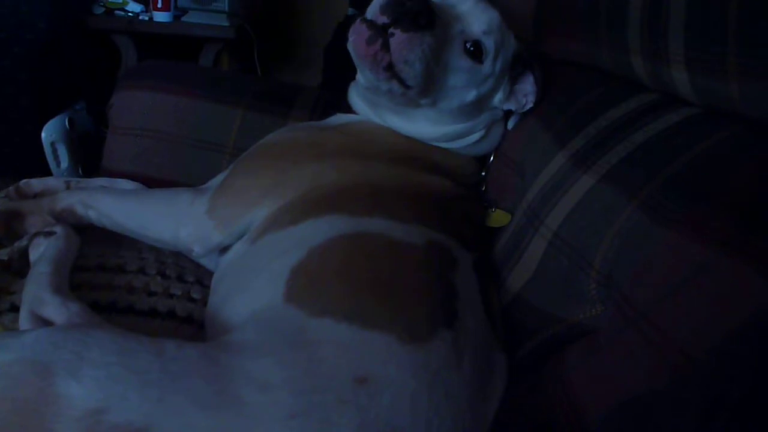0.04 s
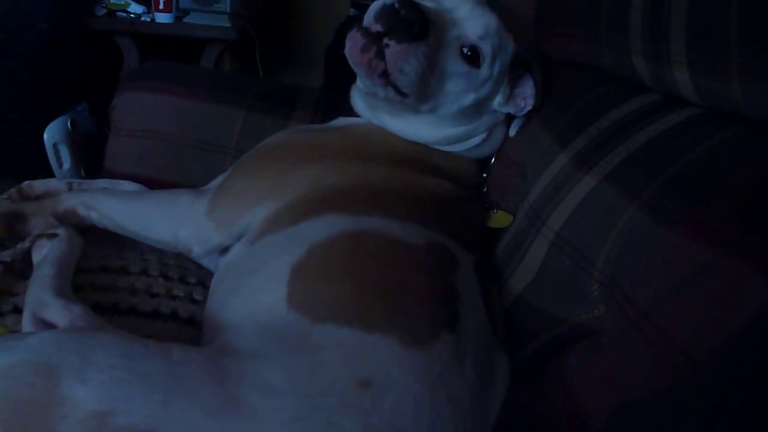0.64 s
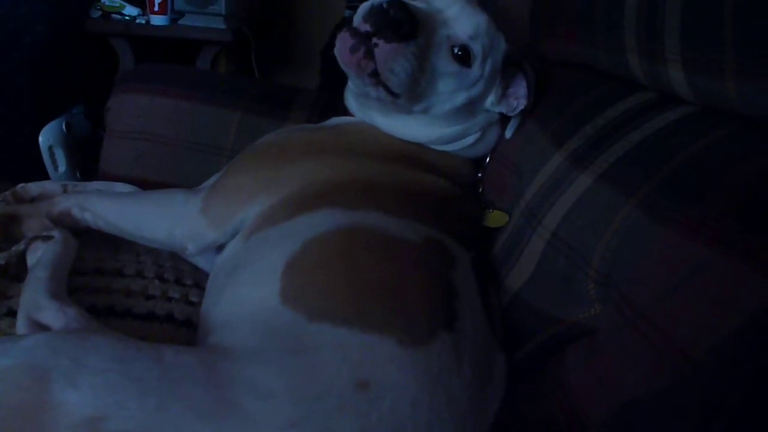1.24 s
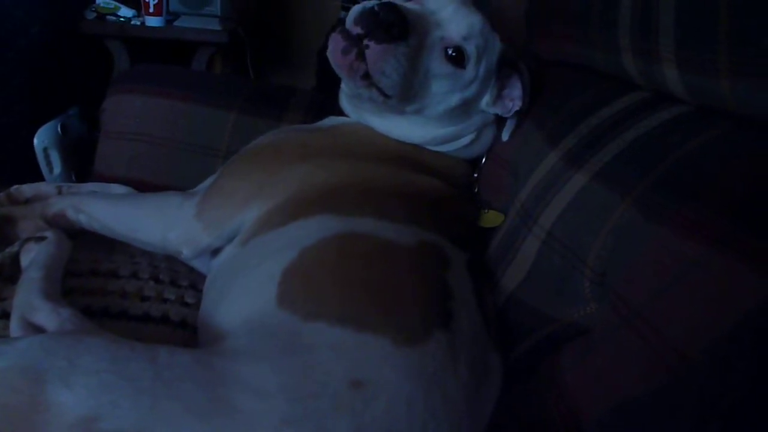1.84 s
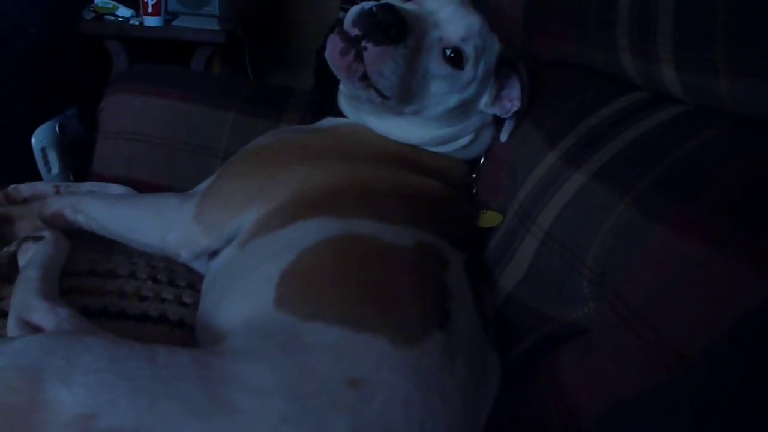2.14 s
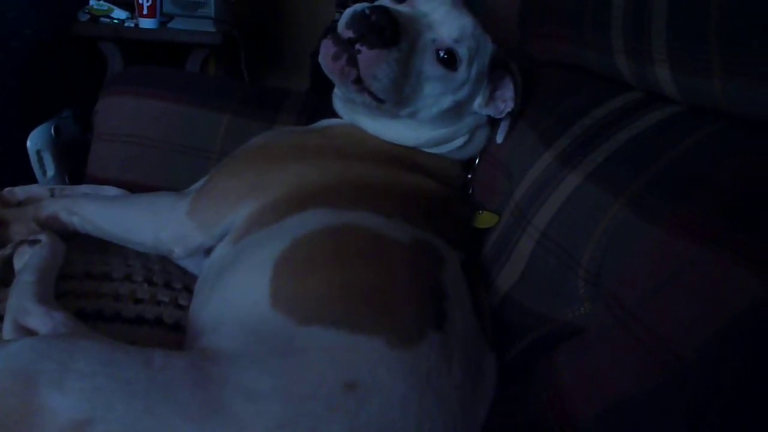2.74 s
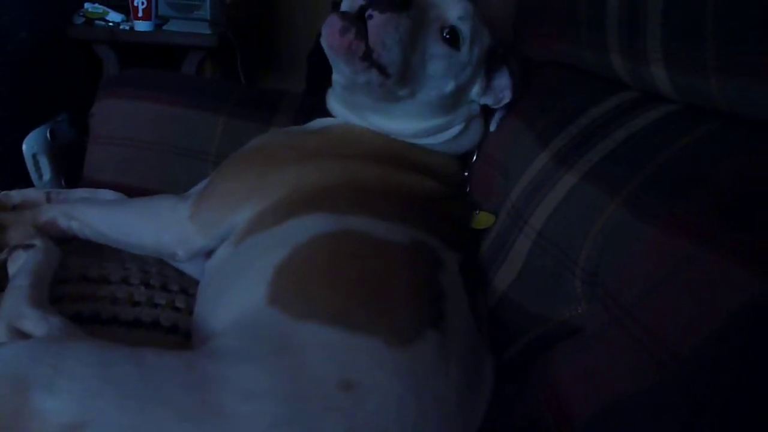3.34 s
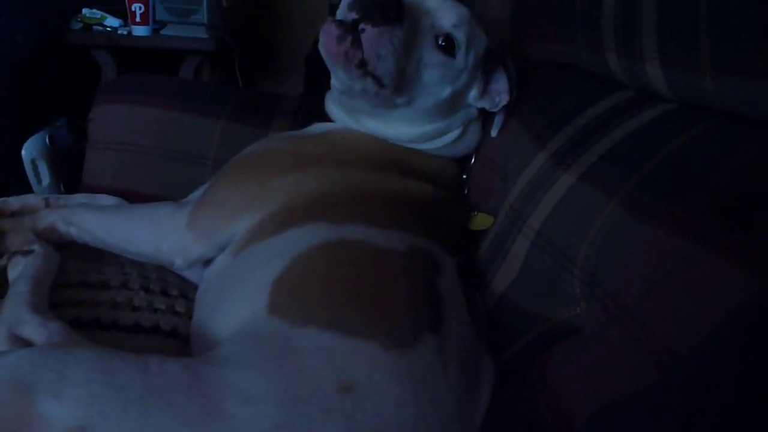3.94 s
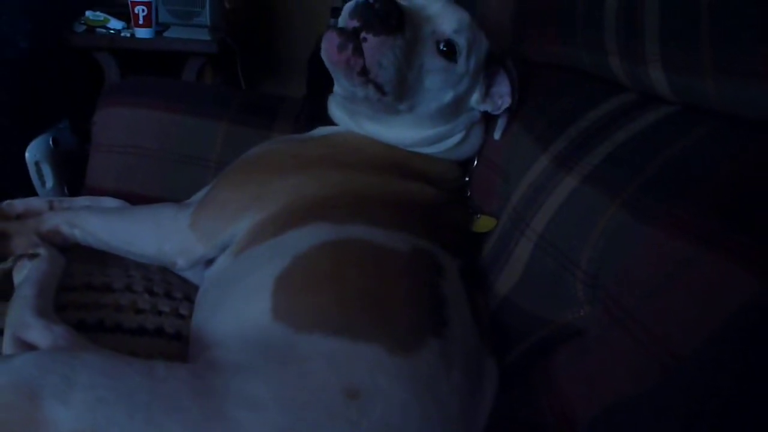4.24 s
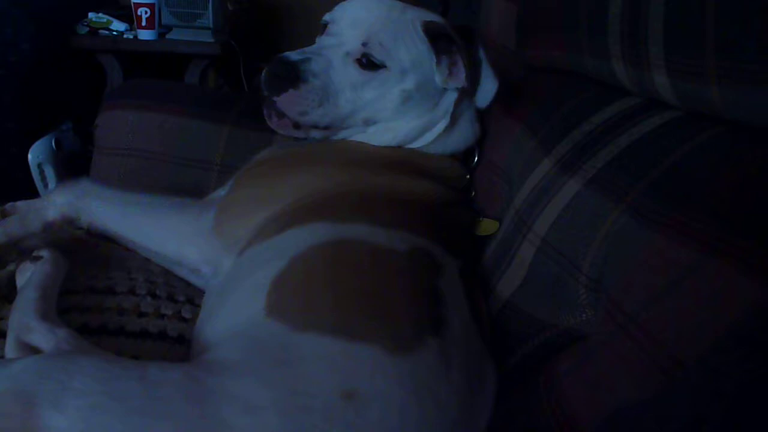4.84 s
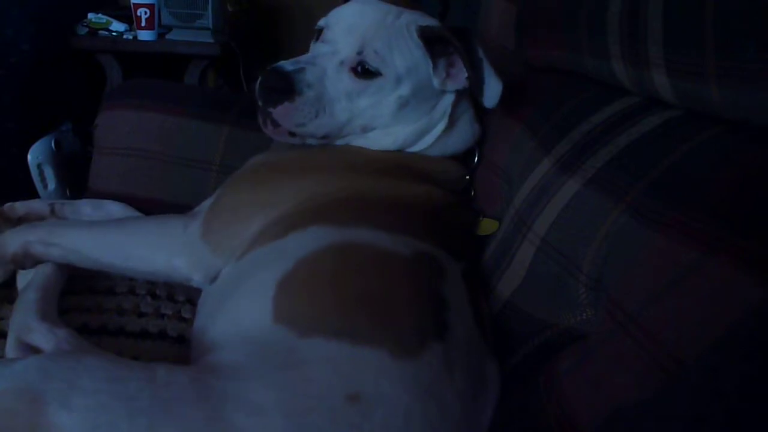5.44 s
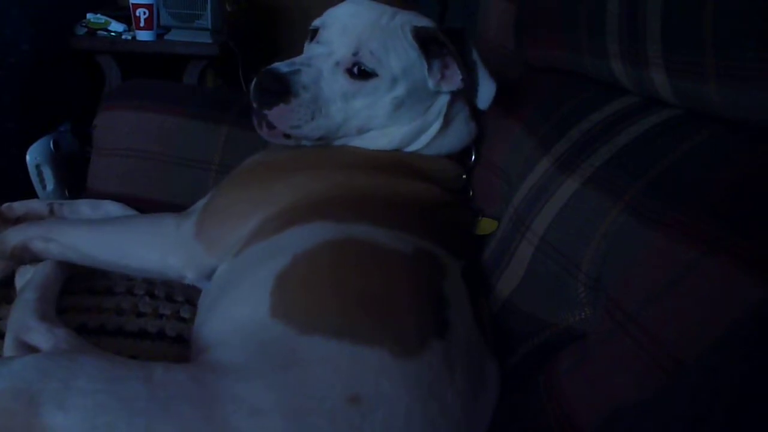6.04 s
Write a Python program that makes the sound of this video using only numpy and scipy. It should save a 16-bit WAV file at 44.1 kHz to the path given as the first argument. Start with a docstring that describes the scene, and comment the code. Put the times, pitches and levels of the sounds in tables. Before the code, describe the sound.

A young dog growls close to the microphone in a quiet furnished room. The growls are low, rough and throbbing, with an uneven rattle in the throat and a faint hiss on top. The first is brief, ending at 0.3 seconds, with a few small sharp ticks in it. A longer growl runs from about 1.2 to 2.3 seconds. Near 2.9 seconds the dog gives one short, clear yip that rises and falls in pitch and leaves the room ringing briefly. A third growl follows at once, tight at first and then looser, lasting until about 3.9 seconds. Another comes from 4.7 to 5.3 seconds, starting more open-mouthed, and a last one begins near 5.9 seconds, just before the sound ends. Soft room noise lies underneath, sinking under each call and swelling back in the pauses.

```python
"""A young dog on a sofa growls twice, close by, over soft room noise that sinks under each call.
Its slack vocal folds slap shut at uneven intervals, in throbs about 25 times a second, and each slap
rings chest, throat and mouth; now and then a sharp tick is heard. Near 3 s the same voice pulls tight
into one clean, arching yip that leaves the room ringing. The third growl follows at once, its folds
tight at first and then slack again, and two more growls end the scene."""
import sys
import numpy as np
from scipy import signal
from scipy.fft import rfft, irfft, next_fast_len
from scipy.io import wavfile
from scipy.ndimage import uniform_filter1d

SR = 44100
rng = np.random.default_rng(int(sys.argv[2]) if len(sys.argv) > 2 else 0)


def bounce(signal):
    """Save signal as a 16-bit WAV file at the path given by the first command-line argument."""
    frames = np.transpose(np.atleast_2d(signal))
    limited = np.clip(frames, -1, 1)
    pcm = np.round(limited * 32767).astype(np.int16)
    wavfile.write(sys.argv[1], SR, pcm)


N = 269010
T = np.arange(N) / SR
SIDES = np.array([[1], [-1]])   # opposite signs for left and right
YIP_START_S, YIP_BREAK_S, YIP_END_S = 2.917, 2.934, 3.026


def from_db(db):
    """Amplitude ratio of a level in decibels."""
    return 10 ** (np.asarray(db) / 20)


def rms_one(x):
    """Normalisation to unit mean power."""
    return x / np.sqrt(np.mean(x ** 2) + 1e-20)


def in_time(curve):
    """Linear interpolation of a curve at every sample."""
    return np.interp(T, *np.transpose(curve))


def at_hz(points, hz):
    """Interpolation of a spectrum on a log-frequency axis."""
    frequencies, values = np.transpose(points)
    return np.interp(np.log(hz + 1e-3), np.log(frequencies), values)


def smooth(x, seconds):
    """Triangular moving average."""
    size = max(int(seconds * SR), 1)
    return uniform_filter1d(uniform_filter1d(x, size), size)


def during(start, end):
    """Rectangular window: one between two times, else zero."""
    return 1. * ((T >= start) & (T <= end))


def evened(x, seconds):
    """Division by the envelope holds the short-term power at one."""
    return x / np.sqrt(np.abs(smooth(x ** 2, seconds)) + 1e-6 * np.mean(x ** 2))


def cut(x, hz, kind, order=2):
    """Butterworth low- or high-pass."""
    return signal.sosfilt(signal.butter(order, hz, kind, fs=SR, output="sos"), x)


def waver(depth, hz):
    """Random modulation: a factor about one, driven by low-passed noise."""
    return 1 + depth * rms_one(cut(rng.standard_normal(N), hz, "low"))


def resonator(hz, width):
    """Damped oscillator: a two-pole band-pass with unit peak gain."""
    r = np.exp(-np.pi * width / SR)
    return (1 - r * r) / 2 * np.array([1, 0, -1]), [1, -2 * r * np.cos(2 * np.pi * hz / SR), r * r]


def ring(x, modes):
    """Modal superposition: resonators (centre_hz, width_hz, gain_db) in parallel."""
    return sum(from_db(db) * signal.lfilter(*resonator(hz, width), x + 1e-18) for hz, width, db in modes)


def moving_ring(x, hz, width, size=512):
    """Time-varying resonance: centre and bandwidth are updated block by block."""
    out, state, width = np.zeros(N), np.zeros(2), np.broadcast_to(width, N)
    for i in range(0, N, size):
        out[i:i + size], state = signal.lfilter(*resonator(hz[i], width[i]), x[i:i + size], zi=state)
    return out


# Growls: start_s, end_s, attack_s, level_db, throb_period_s;
# balance against the throat, before trims: chest_db, jaw_db, mouth_db, snarl_db, nose_db;
# extra while the muzzle is open: jaw_gape_db, mouth_gape_db, snarl_gape_db;
# extra near the end: mouth_late_db; offset of the belly modes: belly_db
GROWLS = [(0, 0.298, 0.0031, -15, 0.055, -1.5, -21.5, -24, -38, -40, -.5, 1.15, 2.1, 1, 0),
          (1.186, 2.253, 0.016, -13, .037, -6, -25, -21.5, -41, -41, 2.5, 3.5, 7.1, -0.5, 0),
          (3.091, 3.949, 0.13, -14, .039, -6, -30.5, -22.5, -34, -36.5, 7.5, 14.3, 3.6, 1.5, 2),
          (4.747, 5.328, .026, -14.5, .036, -2.5, -12, -24, -47, -43.5, 12.5, 1.2, 4.4, 7, -1.5),
          (5.883, 6.595, 0.0076, -14, .038, -7.5, -8.5, -18.5, -44, -44.5, 1.5, 1.2, 2.1, -2, 0.5)]
# Brief catches of the voice: centre_s, length_s, gain_db
CATCHES = [(2.177, 0.062, -4.5), (5.102, 0.043, -3.5)]


def growl_gesture(closing_s=.21, tiring_s=.11, onset_db=-20, fade_db_per_s=2, release_db_per_s=441):
    """Articulation: level, balance and airway change as the muzzle closes and the air runs out."""
    rows = np.array(GROWLS)
    which = np.searchsorted(rows[:, 0], T, side="right") - 1
    start, end, attack, level, _, chest, jaw, mouth, snarl, nose = rows[which, :10].T
    *open_db, mouth_late, belly = rows[which, 10:].T
    age, left = T - (start + attack), end - T
    held = np.maximum(age, 0)
    tired = np.exp(-np.maximum(left, 0) / tiring_s)
    gape = np.array(open_db) * np.exp(-held / closing_s)
    jaw_gape, mouth_gape, snarl_gape = gape
    onset = onset_db * np.maximum(-age / attack, 0)
    level = level + onset - fade_db_per_s * held - .5 * tired + release_db_per_s * np.minimum(left, 0)
    level += sum(db * smooth(during(s - span / 2, s + span / 2), .01) for s, span, db in CATCHES)
    # as the air runs out, chest and hiss come forward
    balance = {"chest": chest - .35 * jaw_gape + tired,
               "belly": belly - 15.5 * tightness(),   # tight folds hardly ring the belly
               "jaw": jaw + jaw_gape,
               "mouth": mouth + mouth_gape + mouth_late * tired + onset,
               "snarl": snarl + snarl_gape + 11.5 * tired,
               "nose": nose + (2.5 + .43 * mouth_late) * tired}
    progress = np.minimum(held / (end - start), 1)
    return level, balance, airway_shape(which, held, progress, tired, gape)


# Airway in each growl: chest_hz, width_hz, chest_pull_share, lips_hz, lips_db, snarl_hz,
# snarl_width_hz, teeth_hz, teeth_db, lower_nasal_hz, upper_nasal_hz, upper_nasal_db
AIRWAY = [(226.25, 53, .55, 1840, 11.5, 2510, 240, 3350, -16, 5500, 6680, -2),
          (246, 57, .12, 1600, -4.5, 2380, 78, 3480, -15.5, 6860, 7020, 1),
          (274.9, 60, .15, 1557, -11.5, 2505, 110, 2784, -3.5, 5730, 6480, 3.5),
          (230, 40.5, .75, 1640, 2, 2750, 300, 3380, 4, 5405, 6250, -7.5),
          (232.2, 67.6, 0.44, 1670, 5, 2900, 500, 3100, 3, 5500, 6170, 0)]
# Throat resonance, arching in the growls and starting high when the mouth is wide: time_s, centre_hz
THROAT_CURVE = [(0, 420), (.29, 462), (1.19, 456), (1.27, 473), (1.6, 497), (2.25, 476), (3.2, 480),
                (3.5, 426), (3.65, 459.2), (3.94, 458.6), (4.76, 570), (4.97, 543), (5.32, 538),
                (5.89, 531.8), (6.1, 524.8)]


def airway_shape(which, held, progress, tired, gape):
    """Formants follow shape: opening widens them and raises the snarl; tiring relaxes the airway."""
    columns = np.array(AIRWAY)[which].T
    chest_hz, width, pull, lips_hz, lips_db, snarl_hz, snarl_width = columns[:7]
    teeth_hz, teeth_db, lower_hz, upper_hz, upper_db = columns[7:]
    jaw_gape, mouth_gape, snarl_gape = gape
    rest_chest_hz, rest_lips_hz, rest_nasal_hz, sag_hz_per_s = 227.05, 1710, 5550, 410
    lower_hz, upper_hz = lower_hz - sag_hz_per_s * held, upper_hz - sag_hz_per_s * held
    return {"chest_hz": chest_hz + (rest_chest_hz - chest_hz) * progress + 2.5 * mouth_gape,
            "throat_hz": in_time(THROAT_CURVE),
            "width_hz": (width + 1.5 * jaw_gape) * (1 - .78 * tired),
            "pull": pull - .14 * jaw_gape + .15 * tired + .7 * tightness(),
            "lips_hz": lips_hz + (rest_lips_hz - lips_hz) * tired, "lips_db": lips_db,
            "snarl_hz": snarl_hz + 24 * snarl_gape, "snarl_width_hz": snarl_width,
            "teeth_hz": teeth_hz, "teeth_db": teeth_db + .9 * snarl_gape,
            "lower_nasal_hz": lower_hz + (rest_nasal_hz - lower_hz) * tired,
            "upper_nasal_hz": upper_hz, "upper_nasal_db": upper_db}


def tightness(until_s=3.44, slacken_s=.13):
    """Fold tension, 0 to 1: it stays high for a while after the yip, then relaxes."""
    return during(YIP_END_S, until_s) * np.clip((until_s - T) / slacken_s, 0, 1)


def slackness():
    """Tension steadies the voice: this factor scales its unevenness down while the folds are tight."""
    return 1 - .2 * tightness()


# Throbs that stand out, each a burst of hard slaps: start_s, length_s, gain_db
SURGES = [(0.047, 0.033, 0), (0.091, 0.025, 0), (0.144, 0.017, 1), (0.187, 0.021, 2), (0.236, 0.057, 0.5),
          (1.208, 0.017, 0), (1.24, 0.014, 2.5), (1.274, 0.0089, 1), (1.306, 0.013, 1.5),
          (1.344, 0.013, -0.5), (1.378, 0.013, -1), (1.417, 0.014, 0), (1.486, 0.016, 0),
          (1.524, 0.016, 0.5), (1.599, 0.02, 0.5), (1.638, 0.011, 0.5), (1.689, 0.021, 0),
          (1.761, 0.017, -0.5), (1.875, 0.021, 1), (1.944, 0.016, 0.5), (2.024, 0.025, 1.5),
          (2.203, 0.019, 1), (3.187, 0.012, -2), (3.218, 0.062, -1), (3.37, 0.041, 1), (3.457, 0.014, 1.5),
          (3.574, .014, 0.5), (3.693, 0.012, 0.5), (3.738, .015, -0.5), (3.817, .022, 0.5),
          (4.774, 0.016, 0.5), (4.811, 0.021, 0.5), (4.882, 0.022, 1.5), (4.918, .02, 1), (5.043, 0.028, 0),
          (5.142, 0.014, 0.5), (5.206, 0.026, 2.5), (5.256, 0.064, 0.5), (5.891, 0.046, 0),
          (5.954, 0.018, -1), (5.995, 0.0089, 1.5), (6.035, 0.015, 1.5)]


def throb_train(duty=.52, duty_spread=.14, jitter=.13, spread_db=.93):
    """Quasi-periodic pulsing: ordinary throbs (start_s, length_s, gain_db) fill in between surges."""
    throbs = []
    for start, end, attack, _, period, *_ in GROWLS:
        end = min(end, N / SR)
        surges = [row for row in SURGES if start <= row[0] < end]
        resumes = [start + attack] + [s + length + period * (1 - duty) for s, length, _ in surges]
        for first, until in zip(resumes, [row[0] for row in surges] + [end]):
            chance = rng.standard_normal((32, 3))
            count = max(int(round((until - first) / period)), 0)
            for k, (shift, stretch, strength) in enumerate(chance[:count]):
                pace = (until - first) / count
                onset = first + pace * (k + jitter * shift * (k > 0))
                length = pace * np.clip(duty + duty_spread * stretch, .15, .9)
                throbs.append((onset, length, spread_db * strength))
        throbs += surges
    return sorted(throbs)


def throb_effort(throbs, sag_db=-5.5, fall_db_per_s=701):
    """Amplitude modulation, in dB: effort jumps up with each throb and sags after it."""
    effort = sag_db * slackness()
    for start, length, db in throbs:
        effort[max(int(start * SR), 0):int((start + length) * SR)] = db
    fall = fall_db_per_s * T
    return smooth(np.maximum.accumulate(effort + fall) - fall, .0033)


def fold_slaps(throbs, chest_hz, pull, gap_s=.0066, gap_spread=.2, spread_db=2.4, weak_db=-5):
    """Glottal impulses: each throb starts a run of nearly even slaps that weakens to a flutter."""
    slaps, tight, slack = np.zeros(N), tightness(), slackness()
    chest_cycles = np.cumsum(chest_hz * waver(.04, hz=20)) / SR
    starts = [0] + [row[0] for row in throbs]
    lengths = [0] + [row[1] for row in throbs]
    for start, length, end in zip(starts, lengths, starts[1:] + [N / SR]):
        spacing, strength = rng.standard_normal((2, 256))
        now = max(int(start * SR), 0)
        gaps = gap_s * (1 - .25 * tight[now]) * np.exp(gap_spread * slack[now] * spacing)
        age = np.cumsum(gaps) - gaps
        sizes = from_db(slack[now] * (spread_db * strength + weak_db * (age > length)))
        keep = start + age < end - gap_s * .7
        at = np.clip(((start + age[keep]) * SR).astype(int), 0, N - 1)
        # entrainment: the ringing chest draws each closure towards the nearest crest of its swing
        drawn_s = np.clip(pull[at], 0, 1) * (np.round(chest_cycles[at]) - chest_cycles[at]) / chest_hz[at]
        slaps[np.clip(at + (drawn_s * SR).astype(int), 0, N - 1)] = sizes[keep]
    return slaps


# Band that each cavity radiates, by name: low_hz, high_hz
CAVITY_BANDS = {"chest": (92, 375), "throat": (365, 675), "jaw": (600, 1060), "open mouth": (1200, 1900),
                "closed mouth": (980, 1650), "snarl": (2330, 3800)}


def cavity_power(hz, modes, cavity, order=6, raised_hz=0):
    """Resonance curves add in power within the cavity's band; the total is scaled to one."""
    low, high = CAVITY_BANDS[cavity]
    power = sum(from_db(db) ** 2 / (1 + ((hz * hz - centre * centre) / (hz * width)) ** 2)
                for centre, width, db in modes)
    power = power / ((1 + ((low + raised_hz) / hz) ** 8) * (1 + (hz / high) ** (2 * order)))
    return power / power.sum(axis=-1, keepdims=True)


def through_tract(x, power, hop):
    """Minimum-phase filtering, block by block: all resonances start together at the slap."""
    size = 2 * (power.shape[1] - 1)
    cepstrum = irfft(np.log(power + 1e-8) / 2)
    cepstrum[:, 1:size // 2] *= 2
    response = np.exp(rfft(cepstrum[:, :size // 2], size))
    blocks = np.pad(x, (0, len(power) * hop - N)).reshape(-1, hop)
    out = np.zeros(N + size)
    for k, block in enumerate(irfft(rfft(blocks, size) * response)):
        out[k * hop:k * hop + size] += block
    return out[:N]


# Stationary resonances of each part of the airway: centre_hz, width_hz, gain_db
BELLY_MODES = [(143, 20, -10.5), (90, 30, -20)]
NECK_MODES = [(506, 32, -3)]
JAW_MODES = [(640, 37, 4), (800, 19, -2), (920, 130, -1.5), (1010, 75, -11)]
MOUTH_MODES = [(1210, 270, 14), (1190, 370, 4), (1520, 85, 0.5)]


def airway_ring(drive, balance, airway, effort, size=4096, hop=512):
    """Formant filtering: chest, throat, jaw and mouth answer each slap as one tube of changing shape."""
    hz = np.maximum(np.arange(size // 2 + 1) * SR / size, 1)
    gain = {name: curve[::hop, None] for name, curve in balance.items()}
    shape = {name: curve[::hop, None] for name, curve in airway.items()}
    belly = [(centre, width, db + gain["belly"]) for centre, width, db in BELLY_MODES]
    chest_modes = [(shape["chest_hz"], 1.1 * shape["width_hz"], 0)] + belly
    chest = cavity_power(hz, chest_modes, "chest", order=3, raised_hz=130 * tightness()[::hop, None])
    throat = cavity_power(hz, [(shape["throat_hz"], shape["width_hz"], 0)] + NECK_MODES, "throat")
    # one jaw resonance moves with the throat and rings more as the jaw opens
    jaw = cavity_power(hz, [(1.19 * shape["throat_hz"], 57, 18 + .85 * gain["jaw"])] + JAW_MODES, "jaw")
    lips = [(shape["lips_hz"], 95, shape["lips_db"])] + MOUTH_MODES
    opening = np.clip((shape["lips_hz"] - 1600) / 130, 0, 1)
    mouth = opening * cavity_power(hz, lips, "open mouth", order=16)
    mouth += (1 - opening) * cavity_power(hz, lips, "closed mouth", order=10)
    bright_db = .72 * effort[::hop, None]   # the upper parts sag further between throbs
    parts = [(chest, gain["chest"] + 1), (jaw, gain["jaw"] + 2.5 + bright_db),
             (mouth, gain["mouth"] - .5 + bright_db)]
    return through_tract(drive, throat + sum(power * from_db(db) ** 2 for power, db in parts), hop)


def snarl_hiss(spray, airway, teeth_width_hz=140):
    """Flow through a constriction: air squeezed past the teeth excites two resonances."""
    snarl = moving_ring(spray, airway["snarl_hz"], airway["snarl_width_hz"])
    teeth = from_db(airway["teeth_db"]) * moving_ring(spray, airway["teeth_hz"], teeth_width_hz)
    low, high = CAVITY_BANDS["snarl"]
    return cut(cut(snarl - teeth, low, "high", order=4), high, "low", order=8)


def nose_hiss(puffs, airway, width_hz=280):
    """Resonant filtering of noise: air through the nose makes a thin hiss with three peaks."""
    lower_hz = airway["lower_nasal_hz"]
    peaks = [(.84 * lower_hz, -7), (lower_hz, 0), (airway["upper_nasal_hz"], airway["upper_nasal_db"])]
    return sum(from_db(db) * moving_ring(moving_ring(puffs, hz, width_hz), hz, 3 * width_hz)
               for hz, db in peaks)


def growl(fold_rasp=.02, mouth_rasp=.026, puff_decay_s=.0025):
    """Source and filter: slaps and puffs of air ring the airway; throbs set loudness and brightness."""
    level, balance, airway = growl_gesture()
    throbs = throb_train()
    effort = throb_effort(throbs)
    slaps = fold_slaps(throbs, airway["chest_hz"], airway["pull"])
    airflow = .5 + signal.lfilter([1], [1, -np.exp(-1 / (puff_decay_s * SR))], slaps)
    puffs = airflow * rng.standard_normal(N)
    drive = slaps + fold_rasp * puffs + mouth_rasp * cut(puffs, 900, "high")
    body = evened(airway_ring(drive, balance, airway, effort), .011)
    body = body + from_db(-15.5) * cut(body, 1000, "high", order=1) * SIDES
    snarl = evened(snarl_hiss(slaps + .12 * puffs, airway), .019)
    nose = evened(nose_hiss(puffs, airway), .019)
    voice = body + snarl * from_db(balance["snarl"] - 2 + 2.25 * SIDES)
    voice += nose * from_db(balance["nose"] + 1 + 1.75 * SIDES)
    return cut(voice * from_db(effort) * smooth(from_db(level), .0045), 53, "high")


def reverberation(x, t60_s=.18, spread=.28, wall_hz=3500):
    """Diffuse reflections in a furnished room decay exponentially, nearly alike left and right."""
    t = np.arange(SR // 2) / SR
    mid, side = rng.standard_normal((2, len(t))) * from_db(-60 * t / t60_s) * (t > .006)
    tail = cut(mid + spread * side * SIDES, wall_hz, "low", order=1)
    return signal.fftconvolve(x, tail / np.sqrt(np.sum(tail[0] ** 2)), axes=1)[:, :N]


# Likeness of the noise at left and right: frequency_hz, coherence_share
COHERENCE = [(60, 0.92), (160, 0.91), (400, 0.92), (1050, 0.71), (2720, 0.024), (7070, 0.14)]


def stereo_noise(spectrum):
    """Partial coherence: coloured noise, alike on both sides in the bass and less so in the treble."""
    size = next_fast_len(N)
    hz = np.arange(size // 2 + 1) * SR / size
    mid, side = rfft(rng.standard_normal((2, size)))
    alike = at_hz(COHERENCE, hz)
    both = np.sqrt(1 + alike) * mid + np.sqrt(1 - alike) * side * SIDES
    return rms_one(irfft(both * from_db(at_hz(spectrum, hz)), size)[:, :N])


# Spectrum of the room noise: frequency_hz, relative_density_db
ROOM_SPECTRUM = [(18, -60), (30, -30), (97, -6), (214, -8), (257, -15), (289, -6), (399, -5), (428, -11),
                 (551, -1), (916, -19), (982, -14), (1830, -22), (3420, -20), (5950, -29), (7500, -40),
                 (9750, -70), (16500, -120)]


def room_noise(level_db=-41, growl_dip_db=6, yip_dip_db=14, recovery_db_per_s=7.5):
    """Modulated broadband noise: it sinks at once under each call and swells back steadily."""
    dip = growl_dip_db * sum(during(start, end) for start, end, *_ in GROWLS)
    dip += yip_dip_db * during(YIP_START_S, YIP_END_S)
    recovery = recovery_db_per_s * T
    dip = smooth(np.maximum.accumulate(dip + recovery) - recovery, .018)
    return from_db(level_db - dip) * stereo_noise(ROOM_SPECTRUM)


# Brief, sharp ticks heard within the growls: time_s, centre_hz, gain_db
GROWL_TICKS = [(0.068, 2000, -14), (.163, 1980, -11), (0.208, 2200, -11), (1.314, 5150, -16),
               (5.922, 3170, -12)]


def growl_ticks(width_hz=2400):
    """Impulse response of a heavily damped resonance: a brief, sharp tick within a growl."""
    out = np.zeros(N)
    for s, hz, db in GROWL_TICKS:
        tick = ring(signal.unit_impulse(N, int(s * SR)), [(hz, width_hz, db)])
        out += ring(tick, [(hz, width_hz, 0)])
    return out


# Fundamental, octave, overtones and rasp of the yip, by name:
# before_break_db, after_break_db, fade_db_per_s, release_db_per_s
YIP_PARTS = {"fundamental": (-18.5, -6.5, 102.5, 619), "octave": (-6, -22, 89, 1203),
             "overtones": (-25.5, -30, 150, 599), "rasp": (-28.5, -34.5, 3, 172)}


def yip_level(part, attack_db_per_s=6000, break_length_s=.0046):
    """Envelope of one part in dB: a sharp attack, a step at the break, a fade and a release."""
    before_db, after_db, fade, release = YIP_PARTS[part]
    broken = np.clip((T - YIP_BREAK_S) / break_length_s + .5, 0, 1)
    attack_db = attack_db_per_s * np.maximum(YIP_START_S - T, 0)
    decay_db = fade * np.maximum(T - YIP_BREAK_S, 0) + release * np.maximum(T - YIP_END_S, 0)
    return before_db + (after_db - before_db) * broken - attack_db - decay_db


# Pitch of the yip, arching before and after the break: time_s, pitch_hz
YIP_PITCH = [(2.91, 549.3), (2.929, 592), (2.939, 510), (2.96, 582), (2.981, 623), (3.005, 597),
             (3.028, 534), (3.076, 350), (3.12, 307)]
# Spectral envelopes of its overtones and its rasp: frequency_hz, gain_db
OVERTONE_COLOUR = [(300, -43.5), (700, -19.5), (1300, 13.5), (1750, -5.5), (2100, -12), (2350, 4.5),
                   (2700, -7), (3300, -8.5), (4200, -10), (5300, -8), (6800, -17), (8000, -33)]
RASP_COLOUR = [(300, -36), (750, -7), (950, -1.5), (1350, 13), (1600, -1), (1850, 4), (2100, 4.5),
               (2600, 5), (3200, -18), (4200, -16.5), (5300, -12.5), (6800, -12.5), (8000, -34)]


def yip(jitter=.0097, shimmer=.39, roughness=.22, rough_from_s=2.975):
    """Harmonic series of tight folds: the open mouth favours the octave first, then the fundamental."""
    pitch = in_time(YIP_PITCH) * waver(jitter, hz=129)
    phase = 2 * np.pi * np.cumsum(pitch) / SR
    tone = from_db(yip_level("fundamental")) * np.sin(phase)
    tone += from_db(yip_level("octave")) * np.sin(2 * phase)
    overtones = sum(from_db(at_hz(OVERTONE_COLOUR, k * pitch))
                    * np.sin(k * phase + rng.uniform(0, 2 * np.pi)) for k in range(3, 14))
    overtones *= from_db(yip_level("overtones")) * waver(shimmer, hz=200)
    rasp = from_db(yip_level("rasp")) * stereo_noise(RASP_COLOUR) * (1 + np.sin(phase))
    failing = smooth(during(rough_from_s, N / SR), .01)   # losing its support, the tone turns rough
    tone *= waver(roughness * failing, hz=130)
    return tone + (overtones + rasp) * from_db(1.5 * SIDES)


# Resonances of the room: centre_hz, width_hz, gain_db
ROOM_MODES = [(542, 8.7, -6), (585.6, 3.2, -5.5), (1850, 9, 1.5), (2650, 34, 1)]


def yip_echo(cry):
    """Room response: the loud yip leaves the modes ringing, and its treble reverberates."""
    return ring(cry, ROOM_MODES) + from_db(-12.5) * reverberation(cut(cry, 1800, "high"))


def scene():
    """Superposition of the dog's direct sound, its echo and the room's own noise."""
    growls = growl() * from_db(-.25 * SIDES) + growl_ticks()
    cry = yip()
    return growls + room_noise() + from_db(-18) * reverberation(growls) + cry + yip_echo(cry)


def record(dry, cutoff_hz=7750, fade_s=.012):
    """Band limiting: a steep low-pass cuts the top, and the sound ends with a very short fade."""
    fade = np.minimum(np.arange(N)[::-1] / (fade_s * SR), 1)
    return signal.sosfilt(signal.ellip(8, .3, 70, cutoff_hz, fs=SR, output="sos"), dry * fade)


dry = scene()
out = record(dry)
bounce(out)
```